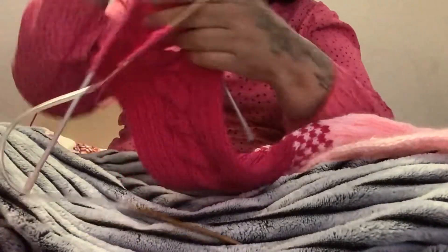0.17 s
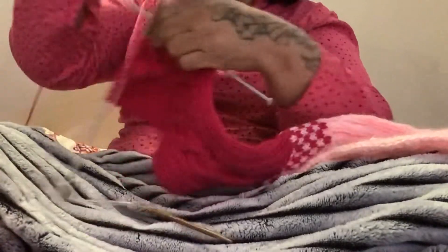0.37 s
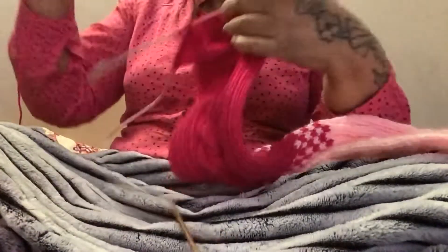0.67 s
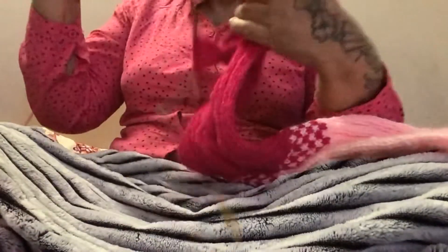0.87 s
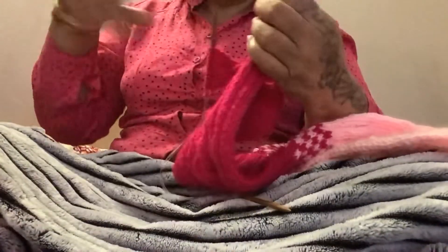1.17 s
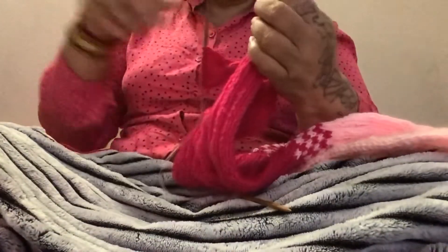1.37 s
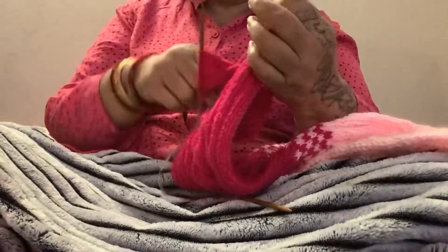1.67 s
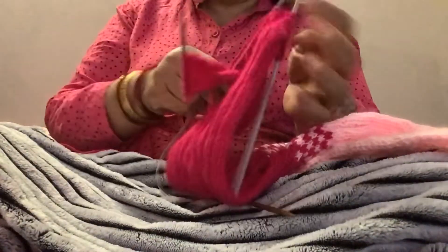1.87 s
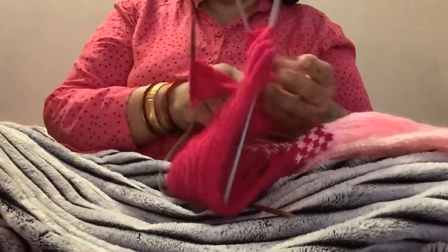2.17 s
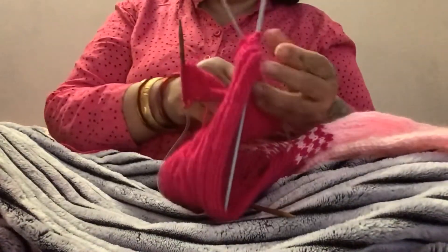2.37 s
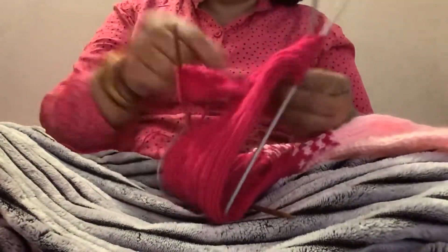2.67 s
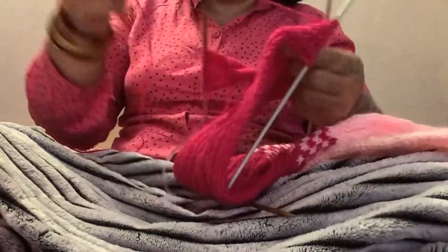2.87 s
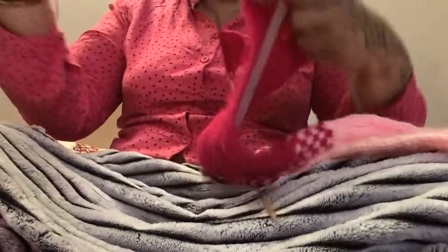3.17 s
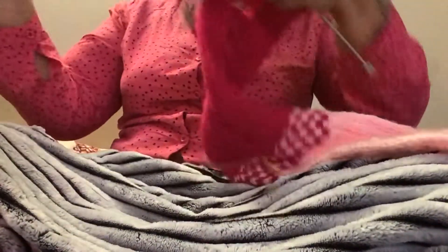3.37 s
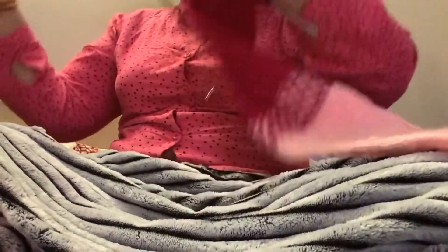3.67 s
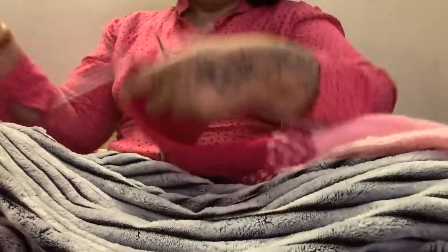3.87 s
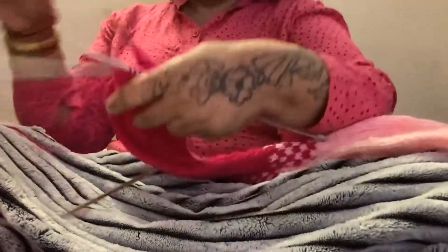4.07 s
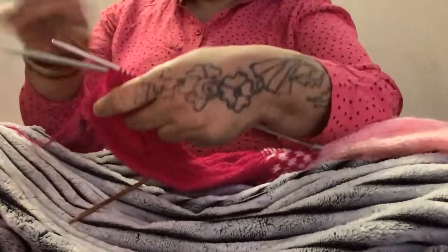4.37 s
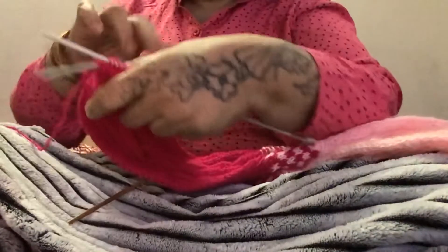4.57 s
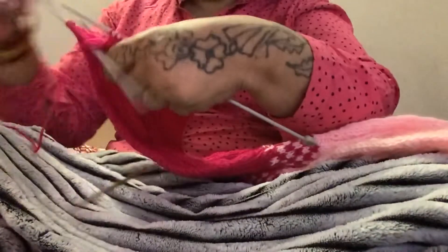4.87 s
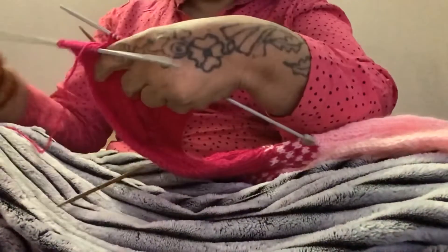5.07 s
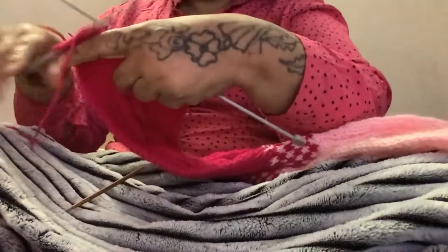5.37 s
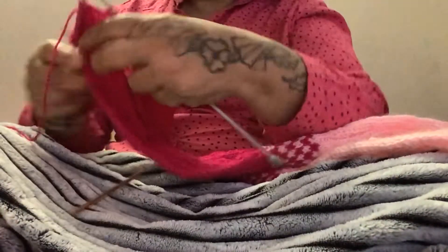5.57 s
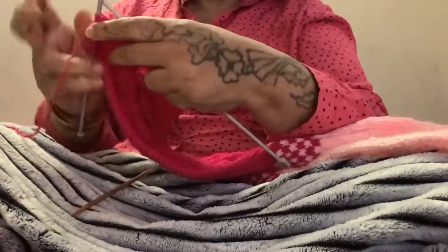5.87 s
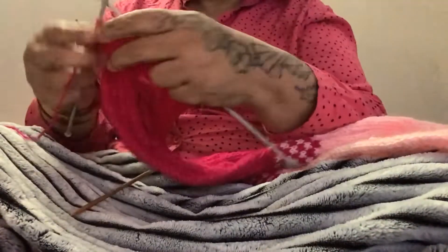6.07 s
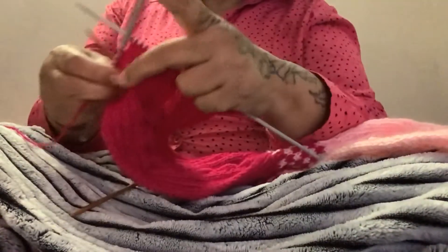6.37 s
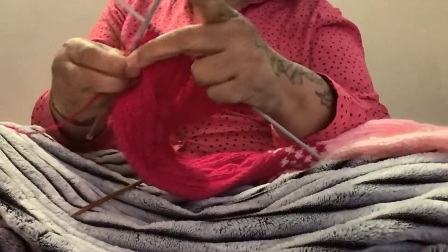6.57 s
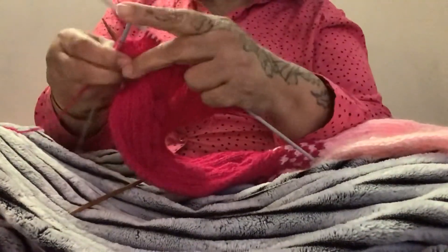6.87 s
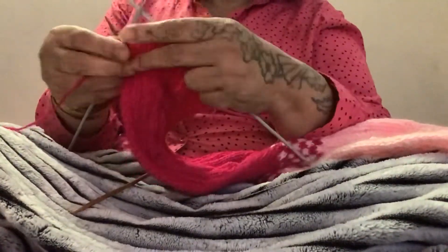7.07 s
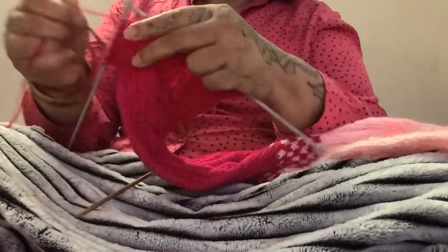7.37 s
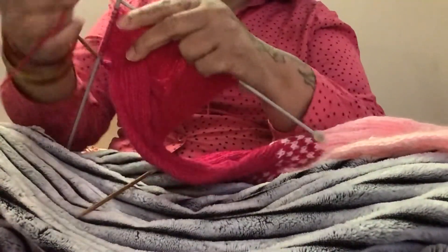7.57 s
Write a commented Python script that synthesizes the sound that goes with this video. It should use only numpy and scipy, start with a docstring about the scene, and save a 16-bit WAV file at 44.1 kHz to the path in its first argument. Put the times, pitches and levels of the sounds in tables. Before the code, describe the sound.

In a small, softly furnished room, a low mains-like hum with a slowly pulsing rumble runs throughout under faint hiss. Close to a phone microphone, thin metal needles give sparse, bright, very short clicks, some much louder than the rest. A dry wooden knock comes early. Wool rubs in soft grainy swishes and a heavy blanket shifts dully. A cluster of taps comes later, then a quiet clink at the end.

```python
"""Knitting in a quiet room, close to a phone. A motor (tones and rumble) and air (shaped noise) run throughout.
Wool and cloth rub from the start, as swelling bands of grainy noise. Then thick and thin metal needles tap,
each blow a noisy crack plus tones that die quickly, and room echoes follow. Dull knocks, a loose needle's
rattling slides and taps, and a wooden knock join within the first second. A blanket shifts later, in lower
noise bands, and a short needle clinks near the end."""
import sys
import numpy as np
from scipy import signal
from scipy.fft import rfft, irfft, next_fast_len
from scipy.io import wavfile
from scipy.ndimage import uniform_filter1d

SR = 44100
rng = np.random.default_rng(int(sys.argv[2]) if len(sys.argv) > 2 else 0)


def int16_out(signal):
    """Quantize to a 16-bit WAV file."""
    q = np.round(np.clip(np.atleast_2d(signal).T, -1, 1) * 32767)
    wavfile.write(sys.argv[1], SR, q.astype(np.int16))


def natural_amplitude(level_db):
    """Convert a level in decibels to a linear amplitude factor, elementwise."""
    exponent = np.asarray(level_db, float) / 20
    return 10 ** exponent


N = 340893


def level(x, db):
    """Set the rms, the average strength of a sound."""
    return x * natural_amplitude(db) / np.sqrt(np.mean(x ** 2))


def noise(gain_db):
    """Noise of rms 1 whose level per Hz follows gain_db(Hz)."""
    size = next_fast_len(N)
    hz = np.arange(1, size // 2 + 2) * SR / size
    spectrum = rfft(rng.standard_normal(size)) * natural_amplitude(gain_db(hz))
    return level(irfft(spectrum, size)[:N], 0)


def colour(points):
    """Turn a (Hz, dB) table into a smooth function of frequency."""
    hz, db = np.transpose(points)
    return lambda f: np.interp(np.log(f), np.log(hz), db)


def walk(rate):
    """Wander at random: levels held 1 / rate s, then smoothed twice; spread near 1."""
    hold = int(SR / rate)
    steps = np.repeat(rng.standard_normal(N // hold + 1), hold)
    return 0.78 * uniform_filter1d(uniform_filter1d(steps, hold), hold)[:N]


def add(out, s, x):
    """Mix x into out from s seconds on, or from the very start if s is negative."""
    i = max(int(s * SR), 0)
    out[i:i + len(x)] += x[:len(out) - i]


def waver(hz, width_hz, db):
    """An unsteady tone: noise squeezed into a narrow resonance."""
    return natural_amplitude(db) * noise(lambda f: -20 * np.log10(1 + (2 * (f - hz) / width_hz) ** 2))


# hum at even multiples of the mains: f/Hz, level/dB rms
MAINS_HUM = [(120, -49.5), (240, -59), (600, -80.5)]
# unsteady tones beside the hum: f/Hz, width/Hz, level/dB rms
UNSTEADY_TONES = [(150.6, 7.4, -59.5), (182.2, 9, -60.5), (266.8, 12, -72), (409.6, 13, -78.5)]
# colour of the motor's rumble: f/Hz, relative level/dB per Hz
RUMBLE_SHAPE = [(25, -66), (32, -56), (40, -45.5), (50, -15), (60, 2), (72, -4), (83, -1.5), (95, -6.5),
                (110, -2.5), (135, -10.5), (200, -30), (400, -103)]


def motor():
    """Mains hum that wavers a little, unsteady tones beside it, a rumble and a low tone that swells."""
    rumble_db, throb_hz, throb_width_hz, throb_db = -50, 84, 13, -47.5
    # the low tone swells at an even pace; swell_range_db spans its weakest to strongest
    swell_every_s, swell_first_s, swell_range_db, swell_sharpness = 1.255, 0.92, 10.5, 1.6
    t = np.arange(N) / SR
    swell = (.5 + .5 * np.cos(2 * np.pi * (t - swell_first_s) / swell_every_s)) ** swell_sharpness
    out = natural_amplitude(rumble_db) * noise(colour(RUMBLE_SHAPE))
    out += natural_amplitude(swell_range_db * (swell - 0.5)) * waver(throb_hz, throb_width_hz, throb_db)
    for hz, db in MAINS_HUM:
        tone = np.sin(2 * np.pi * (hz * t + rng.random()))
        out += level(natural_amplitude(1.6 * walk(6.8)) * tone, db)
    return out + sum(waver(*tone) for tone in UNSTEADY_TONES)


# colour of the low air noise: f/Hz, relative level/dB per Hz
AIR_SHAPE = [(90, -24.5), (130, 0.5), (170, -6), (200, 1.5), (230, -0.5), (290, -6), (340, -12), (480, -17),
             (560, -22), (700, -29.5), (900, -37), (1300, -58), (2500, -100)]
# colour of the hiss: f/Hz, relative level/dB per Hz
HISS_SHAPE = [(500, -13.5), (1000, 1.5), (2500, -0.5), (6000, -2.5), (12000, -3), (15000, -6.5),
              (15500, -11), (15900, -36)]


def air_and_hiss():
    """Low air noise whose level drifts slightly, and a steady hiss: random motion with no pitch."""
    air = natural_amplitude(-57.5 + 0.48 * walk(5.4)) * noise(colour(AIR_SHAPE))
    return air + natural_amplitude(-75.5) * noise(colour(HISS_SHAPE))


# needles in the stitches strengthen these bands of a rub: f/Hz, level/dB
STITCH_PEAKS = [(1500, 5), (2250, 4), (3000, 5), (3800, 3), (4900, 4), (6800, 6), (8300, 3), (9700, 4)]


def drag(table, fall_s, fall_per_rise, grain_db):
    """Fibres drag: a band of grainy noise swells to its time and dies away, more slowly if it rose slowly."""
    stitch_width = .05  # as a share of the band's frequency
    out = np.zeros(N)
    grain = natural_amplitude(grain_db * walk(490) + 1.32 * walk(60))
    hz = np.arange(1, SR // 2 + 2)
    for s, db, centre_hz, octaves, rise in table:
        t = np.arange(SR) / SR - 2 * rise
        band = np.exp(-(np.log2(hz / centre_hz) / octaves) ** 2) / np.sqrt(hz)
        band *= natural_amplitude(sum(peak_db * np.exp(-(np.log(hz / f) / stitch_width) ** 2) for f, peak_db in STITCH_PEAKS))
        x = level(irfft(rfft(rng.standard_normal(SR)) * band), db)
        swelling = np.exp(-2 * (t / rise) ** 2)
        dying = natural_amplitude(-60 * t / (fall_s + fall_per_rise * rise))  # 60 dB down after this many seconds
        add(out, s - 2 * rise, x * np.where(t < 0, swelling, dying))
    return out * grain


# wool and cloth rubs: t/s, level/dB before swell and grain, centre f/Hz, width/octaves, rise/s
WOOL_RUBS = [(.0, -68.5, 1790, 3.9, 0.005), (.5, -73.5, 1900, 1.1, 0.05), (.64, -77, 2700, .2, .025),
             (1.14, -78, 2230, 0.07, 0.012), (1.538, -57.5, 3420, 1.5, 0.028), (1.61, -69, 3000, .7, .02),
             (1.655, -73, 2700, .4, .01), (2.22, -80, 1550, 0.21, 0.08), (2.25, -82.5, 2950, 0.18, 0.089),
             (2.418, -56.5, 2550, 1.54, 0.009), (2.62, -77, 2800, 0.18, 0.05),
             (2.62, -82, 1502, 0.23, 0.038), (3.15, -79.5, 1607, 0.63, 0.015),
             (3.419, -70, 1200, 0.85, 0.002), (3.88, -65.5, 3750, 1.42, 0.034),
             (4.145, -69, 1607, 1.4, 0.011), (4.42, -77, 2000, 1.04, 0.022),
             (4.48, -71.5, 2350, 1.1, 0.022), (4.92, -79, 1620, 0.26, 0.042),
             (5.02, -79, 2100, 0.44, 0.024), (5.252, -63, 1950, 0.55, 0.005), (5.305, -73, 3600, .3, .006),
             (5.27, -68.5, 4540, 1.05, 0.03), (6.54, -75.5, 3210, .3, .03), (6.64, -76, 2350, 0.84, 0.039),
             (6.78, -69.5, 10560, 0.72, 0.13), (7.135, -64.5, 1760, 1.3, 0.013),
             (7.195, -72, 2200, .6, .01)]


def rubs():
    """Wool and cloth rub: many fibres catch and slip, which gives grainy noise."""
    return drag(WOOL_RUBS, fall_s=0.3, fall_per_rise=3.1, grain_db=2.0)


# a thin rod sends out little bass: f/Hz, level/dB
ROD_RADIATION = [(800, -44), (2300, 3.5), (15000, 1), (16500, -22.5)]


def ring(modes, low_db, mid_db, top_db, t60, crack_drive_db, favoured_hz=1.0, scatter_db=1.2, detune=0.0047):
    """One blow with peak near 1: a crack of contact noise and decaying bending tones, varied at random."""
    rise_s, grip, favour_db, favour_width = 0.00029, 1.47, 13.5, .04
    t = np.arange(8192) / SR
    hz, db, share = np.transpose(modes)[:, :, None]
    chance = rng.standard_normal((2, len(modes), 1))
    tint = colour([(4300, low_db), (7500, mid_db), (10300, 0), (13500, top_db)])
    favour = np.exp(-(np.log(hz / favoured_hz) / favour_width) ** 2)
    gain = natural_amplitude(db + tint(hz) + favour_db * favour + scatter_db * chance[0])
    phase = 2 * np.pi * (hz * (1 + detune * chance[1]) * t + rng.random(hz.shape))
    # the grip tightens after the blow, so the ring dies faster and faster; t60 * share is its time to -60 dB
    fade = natural_amplitude(-60 * (t / (t60 * share)) ** grip)
    tones = np.sum(gain * fade * np.sin(phase), axis=0) / np.sqrt(np.sum(gain ** 2))
    bins = np.arange(1, len(t) // 2 + 2) * SR / len(t)
    crack_spectrum = rfft(rng.standard_normal(len(t))) * natural_amplitude(tint(bins) + colour(ROD_RADIATION)(bins))
    crack = level(irfft(crack_spectrum), crack_drive_db)
    crack *= natural_amplitude(-60 * (t / min(1.57 * t60, 0.019)) ** grip)
    return (tones + crack / 2) * (1 - np.exp(-t / rise_s))


def taps(table, modes, hold_t60_s, crack_drive_db):
    """Blows on a needle; the holding fingers set the ring time. Returns direct sound and sound for the walls."""
    out = np.zeros((2, N))
    # where a blow lands sets its colour; how the needle points sets what reaches the walls
    for s, db, low_db, mid_db, top_db, share, room_db, *favoured in table:
        x = natural_amplitude(db) * ring(modes, low_db, mid_db, top_db, share * hold_t60_s, crack_drive_db, *favoured)
        add(out[0], s, x)
        add(out[1], s, natural_amplitude(room_db) * x)
    return out


# blows on the thick needle: t/s, peak level/dB (about), lows/dB, mids/dB, top/dB, share of the ring time,
# level towards the walls/dB, and in some rows the favoured f/Hz
THICK_BLOWS = [(0.1092, -55, -3, -7, -8, 1.1, -3, 7630), (0.1105, -67, 3, -15, -20, 1.4, -3, 2610),
               (0.127, -68, 0, -15, -20, .9, -3, 4872), (0.1548, -63, -12, 0, -15, .9, -3, 7630),
               (0.9262, -50, -7, -8, -9, 1.05, -6, 4872), (1.0679, -61, 3, -10, -16, .35, 3, 2610),
               (1.0745, -61, 3, -12, -18, .45, 0, 2610), (1.08, -64, 0, -15, -20, .5, 0, 4872),
               (3.7913, -55, -7, 1, -8, .6, 0, 4872)]
# its bending tones: f/Hz, level/dB, share of the ring time
THICK_MODES = [(1460, -20, .9), (2610, -7, .6), (3780, -18, .6), (4872, -6, 1.3), (4930, -17, .5),
               (6830, -12, .9), (7630, -3, 1.1), (8290, -14, .6), (9500, -14, .6), (10770, -2, .8),
               (13100, -10, .6), (14350, -8, .5)]


def thick_needle():
    """The thick metal needle is tapped: it bends to and fro at its own pitches."""
    return taps(THICK_BLOWS, THICK_MODES, hold_t60_s=0.065, crack_drive_db=3.5)


# echoes off lap and hands: t/s, level/dB
NEAR_ECHOES = [(.004, -14), (.009, -19)]
# colour of the room's tail: f/Hz, level/dB
TAIL_COLOUR = [(1000, -6.5), (2500, 4), (4000, 5), (6000, 2.5), (8500, 1), (10500, -3), (13000, -2),
               (15500, -2)]


def room(x):
    """A few near echoes, then a diffuse tail that the soft furnishing ends early."""
    tail_db, build_s, end_s, end_fade_s = -9.5, 0.011, 0.092, .011
    low_hz, low_t60_s, high_t60_s = 3000, .23, 0.36  # the lower part dies sooner
    t = np.arange(SR // 4) / SR
    tail = noise(colour(TAIL_COLOUR))[:len(t)]
    low = signal.sosfiltfilt(signal.butter(2, low_hz, fs=SR, output="sos"), tail)
    tail = (tail - low) * natural_amplitude(-60 * t / high_t60_s) + low * natural_amplitude(-60 * t / low_t60_s)
    tail *= 1 - np.exp(-t / build_s)
    tail /= 1 + np.exp((t - end_s) / end_fade_s)
    response = natural_amplitude(tail_db) * tail / np.sqrt(np.sum(tail ** 2))
    for s, db in NEAR_ECHOES:
        # a rough surface smears each echo over about a millisecond
        add(response, s, level(rng.standard_normal(40), db) / np.sqrt(40))
    return signal.fftconvolve(x, response)[:N]


# blows on the thin needle: t/s, peak level/dB (about), lows/dB, mids/dB, top/dB, share of the ring time,
# level towards the walls/dB, and in some rows the favoured f/Hz
THIN_BLOWS = [(0.154, -37, -7, -10, 3, .5, 2), (0.3099, -54.5, 0.5, 4, -2, .9, 0),
              (2.0446, -21.5, -19, -8, -1, .55, -2), (2.0462, -50, 3, -3, -10, 3.2, -8, 1434),
              (2.0534, -35, -20, -12, -5, .5, 0), (2.0584, -41, -20, 3, -3, .5, 0),
              (2.0624, -41, -12, -3, 3, .5, 0), (2.0754, -41, -20, 3, -3, .7, 0),
              (2.0834, -42, -22, -3, 0, .7, 0), (3.0929, -47.5, -12.5, 2, -2, .9, 0),
              (3.2919, -16.5, -24, -13, -8, 1.1, -7), (3.3244, -47, -30, -20, -3, .9, 0),
              (3.3544, -55, -4, 3, -10, 1.6, -8, 8240), (3.442, -31.5, -19, -17, 0, 1.2, -2),
              (3.4674, -50, -25, -15, -8, .9, 0), (5.728, -37, -20, -1, 3.5, .9, -2),
              (5.7454, -49, -20, -3, 3, .7, 0), (6.2113, -27.5, -6, 7, 5, .3, -9),
              (6.2254, -53, -15, -5, 2, .5, 0), (6.2304, -47, -15, -3, 2, .5, 0)]
# its bending tones: f/Hz, level/dB, share of the ring time
THIN_MODES = [(1434, -17, 1.1), (2374, -11, .9), (3397, -5, 1.1), (4700, -3, .75), (6390, -6, 1.3),
              (8240, -4, 0.95), (10190, 1.5, 0.75), (10560, -3, 0.317), (11550, -9.5, 0.66),
              (12290, 2, 0.75), (13300, -3, 0.45), (14750, -4, 0.75)]


def thin_needle():
    """The thin metal needle is tapped: its bending tones ring only briefly in the fingers."""
    return taps(THIN_BLOWS, THIN_MODES, hold_t60_s=.019, crack_drive_db=-4.5)


# harder knocks: t/s, peak level/dB (about), lows/dB, mids/dB, top/dB, share of the ring time,
# level towards the walls/dB, and in some rows the favoured f/Hz
DULL_BLOWS = [(0.3264, -58, -6, -21, -11, .9, 2), (1.706, -66, 5, -15, -27, .9, 0, 4100),
              (1.722, -58.5, 5, -7, -27, .9, 0, 4100), (1.785, -64, 3, -12, -25, .9, 0, 4100),
              (3.7517, -61, 1, -16, -31, .9, 2), (3.7915, -49, 0, -8, -6, .9, 0, 4100),
              (4.6931, -59, 0, -26, -26, .9, 2), (5.024, -60.5, -0.5, -9, -29, .9, 2),
              (5.2447, -56, 5, -3, -25, 1.1, 3, 1800), (5.2555, -61, 5, -5, -25, 1.1, 3, 1800),
              (5.2655, -61, 5, -10, -25, 1.1, 3, 1800), (5.279, -64, 0, 3, -25, 1.1, 3, 7990),
              (5.7519, -37, -1, -1, -8, .9, 2), (5.7815, -59, 5, -15, -25, 1.1, 0, 4100),
              (5.8677, -46, 2, -1, -8, 1.2, -2, 6000), (5.8836, -48, 0, 0, -10, .9, -4, 7990),
              (6.0444, -65, -4, -10, -17, .9, 2), (6.1888, -44.5, 0, -1, -3, .8, 0),
              (6.1924, -54, 3, -5, 0, .8, 0), (6.2034, -54, -8, -7, 3, .9, 2, 10660),
              (6.2074, -56, -3, 3, -8, .7, 0)]
# their bending tones: f/Hz, level/dB, share of the ring time
DULL_MODES = [(1800, -3, 0.9), (3000, -14, 1.1), (4100, 0, 0.66), (6000, -12, 1.5), (6540, 5, 0.47),
              (7990, -2, 2.1), (8060, -26, .9), (10660, -9, 0.9), (12000, -6, 0.3), (12800, 1.5, 1.8),
              (13500, -8, 2.1), (14700, 5.5, 1.1)]


def dull_knocks():
    """Harder knocks: the tones die within milliseconds, so one hears a knock more than a ring."""
    return taps(DULL_BLOWS, DULL_MODES, hold_t60_s=0.0062, crack_drive_db=2.2)


# bending tones of a thin needle dangling in the wool: f/Hz, level/dB, share of the ring time
LOOSE_MODES = [(2700, -10, 1.1), (4760, -11, 1.1), (6700, -6, .9), (8270, -3, 1.1), (8850, -12, .9),
               (9290, -7, .9), (10330, -3, .9), (10750, -6, .9), (12360, -3, .9), (14780, -10, .9)]
# it chatters along another needle: start t/s, end t/s, level/dB rms, lows/dB, mids/dB, top/dB, favoured f/Hz
LOOSE_SLIDES = [(0.39, 0.495, -75.5, -14, -3, -15, 8270), (0.5, 0.57, -71, -10, 6, -14, 12360),
                (0.595, 0.7, -66.5, -12, -6, 3, 8850), (1.45, 1.54, -79, -20, 0, -20, 8270),
                (5.97, 6.025, -71, 0, -20, 6, 10330)]


def slides():
    """Dense tiny contacts of uneven size ring the loose needle, at a pitch that shifts with the contact point."""
    contacts_per_s, spread_db, places = 600, 2.0, 4
    out = np.zeros(N)
    for start, end, db, low_db, mid_db, top_db, favoured_hz in LOOSE_SLIDES:
        size = int((end - start) * SR)
        happens, strength, where = rng.random((3, size))
        contacts = (happens < contacts_per_s / SR) * natural_amplitude(-spread_db * np.log(strength + 1e-9))
        contacts = contacts * np.hanning(size) ** .5
        x = 0
        for place in range(places):
            here = contacts * (np.floor(where * places) == place)
            blow = ring(LOOSE_MODES, low_db, mid_db, top_db, .018, -10.0, favoured_hz, detune=.012)
            x = x + signal.fftconvolve(here, blow)
        add(out, start, x * natural_amplitude(db) / np.std(x[:size]))
    return out


# single blows on the loose needle: t/s, peak level/dB (about), lows/dB, mids/dB, top/dB,
# share of the ring time, level towards the walls/dB, favoured f/Hz
LOOSE_BLOWS = [(0.4034, -67, -20, 0, -20, 1.1, 0, 8270), (0.4464, -62, -5, -6, -20, 1.4, 0, 9290),
               (0.4614, -60, 0, -8, -20, 1.4, 0, 9290), (0.5097, -55, 0, 5, -8, .9, 0, 12360),
               (0.5392, -52, -10, 7, -8, .9, 0, 12360), (0.6044, -57, -20, 3, -5, .9, 0, 8270),
               (0.6124, -54, -20, -5, 10, .9, 0, 10330), (0.6374, -59, -15, 0, 0, .9, 0, 8850),
               (0.6629, -47.5, -15, -1, -9, .5, 0, 14780), (5.9489, -64, -20, -20, -20, .9, 0, 10330),
               (5.9795, -61, -15, -20, -3, .6, 0, 10750), (5.9863, -53, 9, -20, 8, .9, -5, 10330),
               (5.9984, -58, -15, -15, -8, 1.1, 0, 10330)]


def loose_needle():
    """Single taps on the loose needle, with the same bending tones as its slides."""
    return taps(LOOSE_BLOWS, LOOSE_MODES, hold_t60_s=.022, crack_drive_db=-5)


# wooden knock: t/s, peak level/dB (about), lows/dB, mids/dB, top/dB, share of the ring time,
# level towards the walls/dB
WOOD_BLOWS = [(0.7272, -24.5, 0, -3, -2, .99, -2)]
# bending tones of a wooden needle: f/Hz, level/dB, share of the ring time
WOOD_MODES = [(2880, -9, 1.1), (3750, -1, .9), (4200, 8, 1.1), (6650, 8, 1), (10200, 1, .9),
              (12600, -5, .8), (14700, 0, 1.1)]


def wooden_needle():
    """A wooden needle knocks: its bending tones die almost at once."""
    return taps(WOOD_BLOWS, WOOD_MODES, hold_t60_s=.0045, crack_drive_db=-4.5)


# the heavy blanket shifts: t/s, level/dB before swell and grain, centre f/Hz, width/octaves, rise/s
BLANKET_SHIFTS = [(1.55, -63, 495, .8, 0.024), (2.2, -73.5, 603, 0.88, 0.033),
                  (2.44, -57.5, 415, 0.65, 0.016), (2.95, -64.5, 330, 0.43, 0.037),
                  (3.43, -59, 428, 0.86, 0.034), (4.15, -63, 480, 0.64, 0.023),
                  (4.48, -69.5, 550, 0.78, 0.038), (5.03, -62.5, 472, 0.75, .13),
                  (5.55, -60, 433, 0.62, 0.038), (6.64, -63, 430, 0.81, 0.035), (7.15, -69, 500, 1, 0.02)]


def blanket():
    """The heavy blanket shifts: dragging fibres again, in lower bands than most of the wool."""
    return drag(BLANKET_SHIFTS, fall_s=0.14, fall_per_rise=9.6, grain_db=3.0)


# clink: t/s, peak level/dB (about), lows/dB, mids/dB, top/dB, share of the ring time, level towards the walls/dB
SHORT_BLOWS = [(7.6479, -46, -6, -10, -6, .99, -7)]
# bending tones of a short loose needle: f/Hz, level/dB, share of the ring time
SHORT_MODES = [(2330, -5.5, 1.16), (6406, -0.5, 1.3), (8150, -2, 0.32), (10150, 2, 0.2), (12300, 4.5, 0.36)]


def short_needle():
    """A short loose needle clinks: a few widely spaced bending tones ring briefly."""
    return taps(SHORT_BLOWS, SHORT_MODES, hold_t60_s=0.051, crack_drive_db=-7)


def scene():
    """Needles heard directly and through the room, wool close by, motor, air and hiss behind."""
    rings = thick_needle() + thin_needle() + loose_needle() + short_needle()
    knocks = dull_knocks() + wooden_needle()
    # the slides go equally to the ear and to the walls
    direct, to_walls = rings + knocks + slides()
    cloth = rubs() + blanket()
    return (direct + room(to_walls) + cloth + motor() + air_and_hiss())[None]


def band_limit(x):
    """A steep low-pass at the top of the band."""
    return signal.sosfilt(signal.butter(12, 16540, fs=SR, output="sos"), x)


def record(dry):
    """The phone cuts the bottom below about 38 Hz and the top above about 15.9 kHz."""
    mix = signal.sosfilt(signal.butter(2, 38, "high", fs=SR, output="sos"), dry)
    mix = signal.sosfilt(signal.butter(8, 15900, fs=SR, output="sos"), mix)
    return band_limit(mix)


dry = scene()
out = record(dry)
int16_out(out)
```